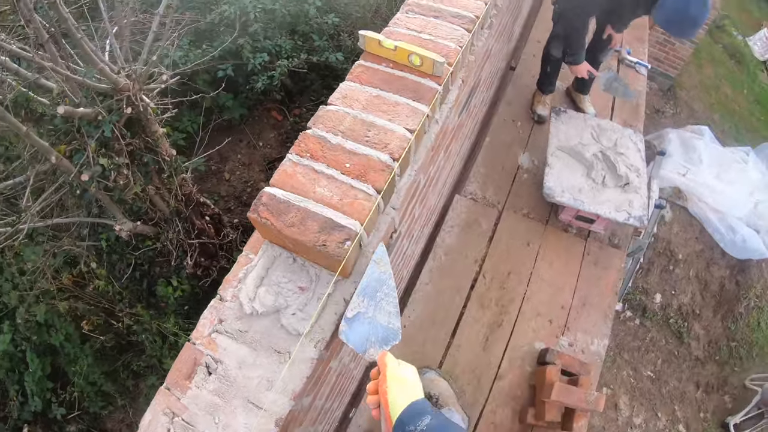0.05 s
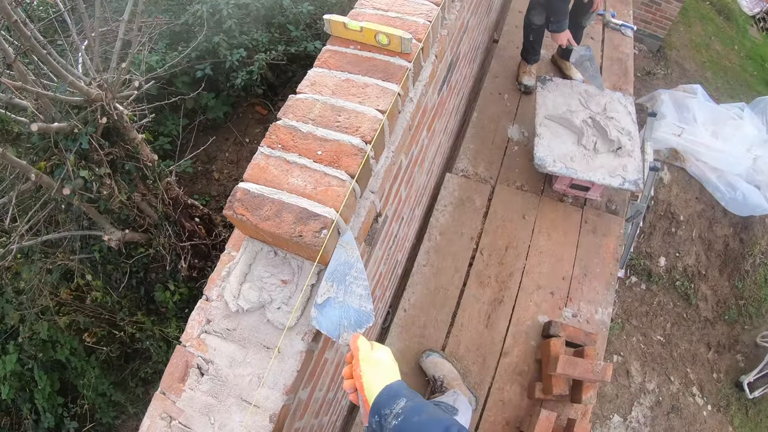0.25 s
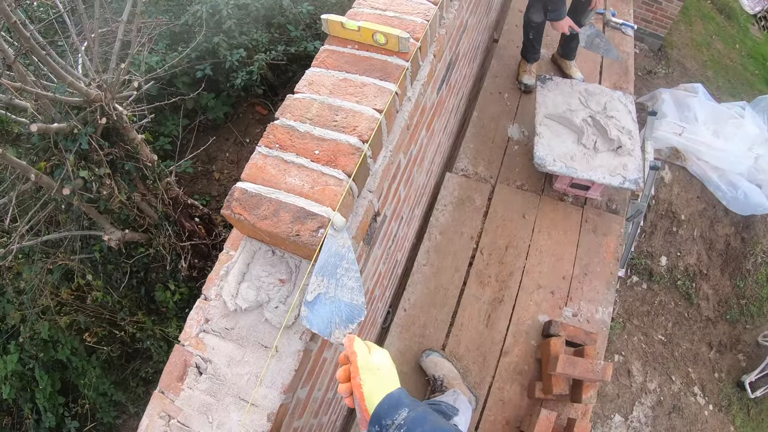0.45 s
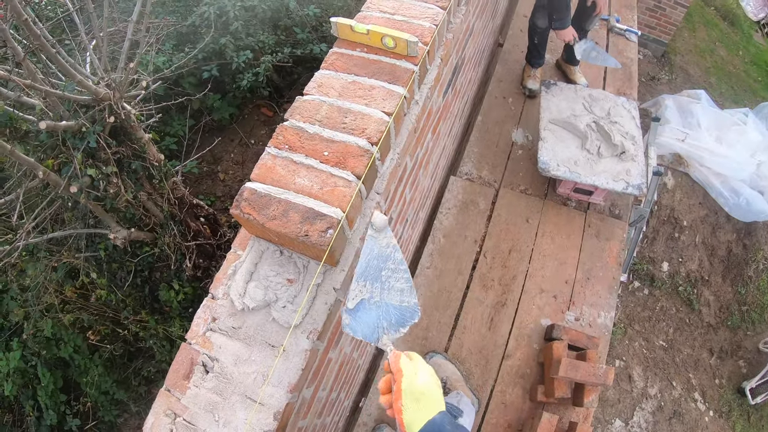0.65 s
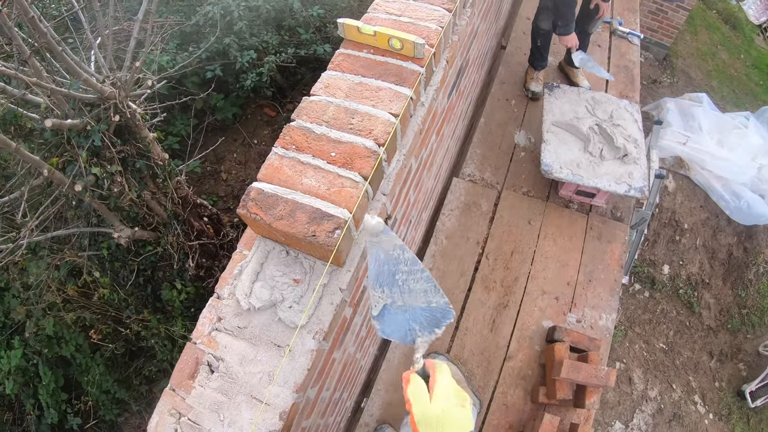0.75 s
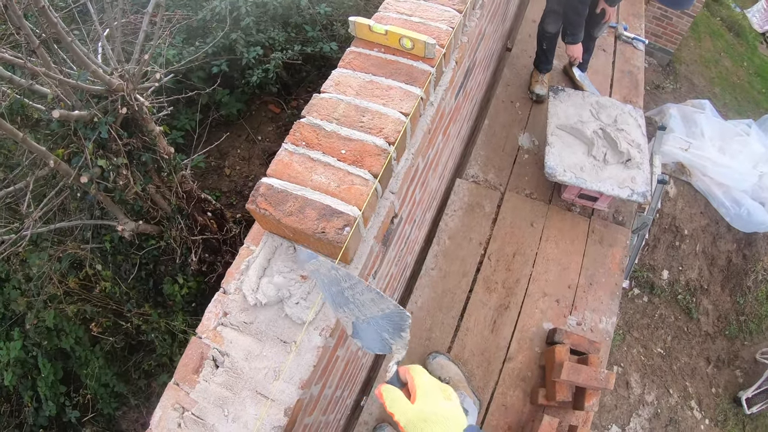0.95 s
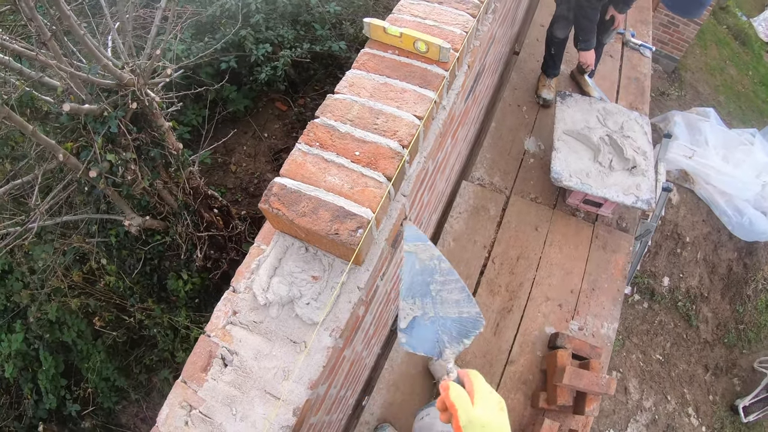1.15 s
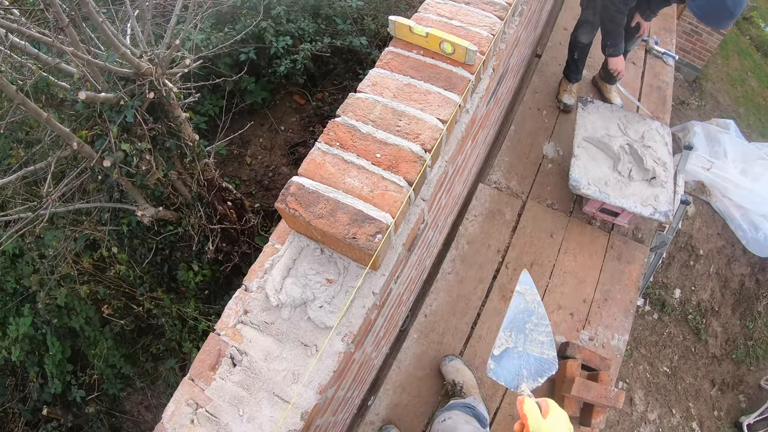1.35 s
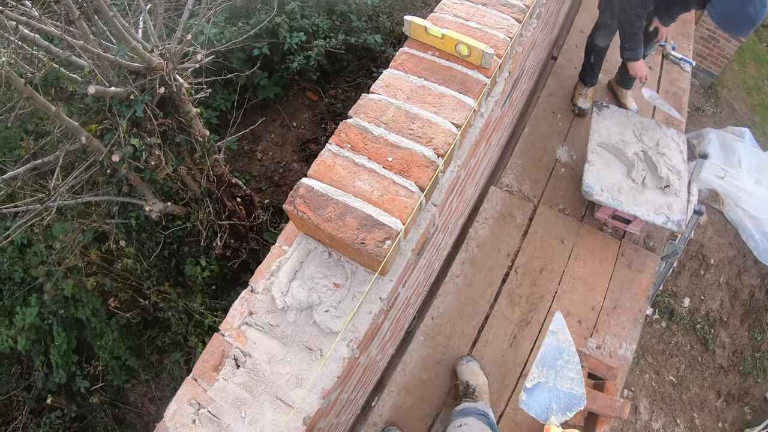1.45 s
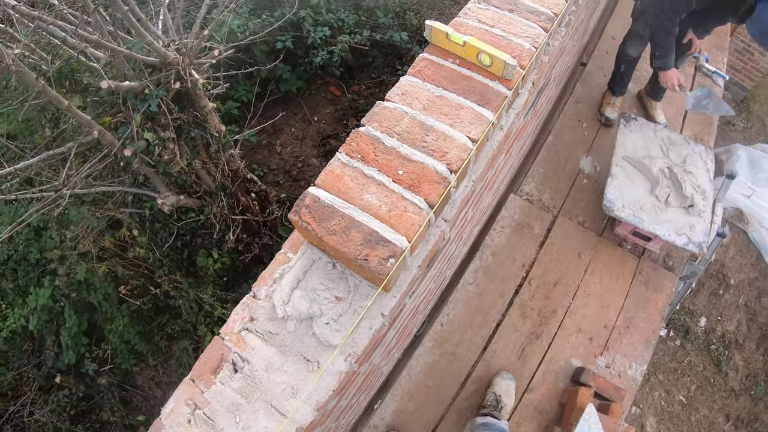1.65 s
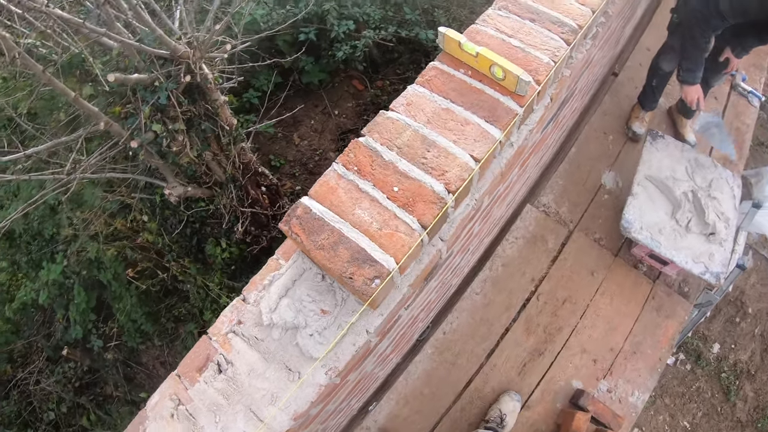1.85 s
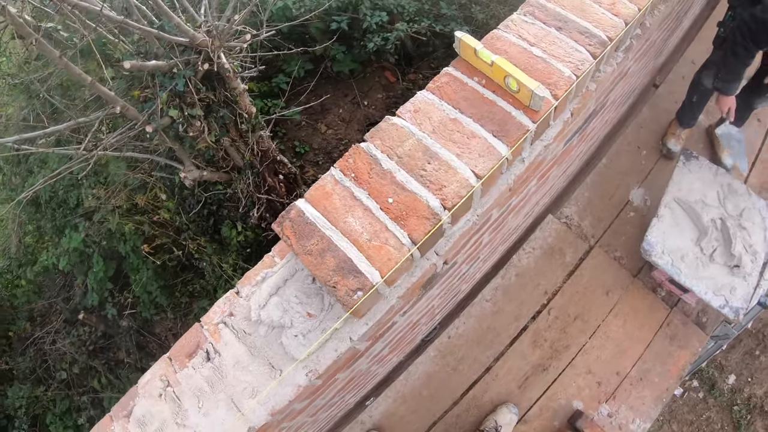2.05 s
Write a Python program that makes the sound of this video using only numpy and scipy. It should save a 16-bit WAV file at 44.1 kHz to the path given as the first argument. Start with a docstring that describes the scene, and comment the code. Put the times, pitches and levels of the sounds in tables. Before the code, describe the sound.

A steel trowel scrapes briefly along gritty mortar outdoors, with faint birds and light wind.

```python
"""A scaffold at a brick wall in a garden. A steel trowel touches the wall and scrapes once along the
mortar joint: sand grinds under the edge, which catches on coarse grit and sets the blade ringing.
Further along the scaffold another trowel clinks and scuffs. Small birds whistle in the trees, a distant
rush and a soft rustle fill the garden, and a gust brushes the microphone."""
import sys
import numpy as np
from scipy import signal
from scipy.fft import rfft, irfft, next_fast_len
from scipy.io import wavfile
from scipy.ndimage import map_coordinates

SR = 44100
rng = np.random.default_rng(int(sys.argv[2]) if len(sys.argv) > 2 else 0)


def generate_wav(signal):
    """Clip the signal to [-1, 1] and save it as 16-bit WAV at the path in sys.argv[1]."""
    frames = np.transpose(np.atleast_2d(signal))
    scaled = np.clip(frames, -1, 1) * 32767
    pcm = np.round(scaled).astype(np.int16)
    wavfile.write(sys.argv[1], SR, pcm)


N = 92610
TIME = np.arange(N) / SR


# the grind follows the pressure of the edge on the joint: time_s, level_db
EDGE_PRESSURE = [(.238, -71.5), (.246, -49), (.272, -51), (.337, -40), (.368, -40.5), (.395, -37.5),
                 (.416, -41), (.43, -37), (.45, -35.5), (.472, -37), (.484, -44), (.502, -61), (.515, -85)]
# the edge lands or catches on grit: start_s, crunch_db, kick_db
EDGE_CATCHES = [(0.241, -36.5, -45), (0.2464, -37.5, -21), (0.329, -55, -23), (0.3397, -33, -31),
                (.3607, -37.5, -6), (0.3702, -31.5, -14), (0.3899, -43, -13.5), (.424, -26.5, -10.5),
                (0.4352, -37.5, -23), (0.4432, -29.5, -5.5), (0.4491, -36, -13), (0.461, -46, -10),
                (.465, -28, -13.5), (0.4728, -44, -16.5), (0.498, -63, -25.5)]
def trowel():
    """One scrape: grinding and sharp catches sound directly and ring the blade; crumbs snap off."""
    pressure_db, = in_time(EDGE_PRESSURE)
    grind = from_db(pressure_db + judder_db())
    crunch = bursts([(s, db) for s, db, _ in EDGE_CATCHES], decay_s=0.0024)
    force = np.hypot(grind, crunch)
    soften = signal.butter(2, 1960, fs=SR, output="sos")
    kicks = signal.sosfilt(soften, clicks([(s, db) for s, _, db in EDGE_CATCHES]))

    def contact(blows):
        grit = from_db(-3) * sand(force) + crumbs() + from_db(-10.5) * force * coarse_grit()
        return grit + blade(from_db(-7) * force * grains() + blows)
    mid = contact(kicks)
    direct = stereo(mid, side=contact(0))
    wall_and_boards = from_db(-27.5) * echo(mid, t60_s=0.16, build_s=0.0032)
    return direct + wall_and_boards + from_db(-21) * tree_echo(mid)


def judder_db(depth_db=3, slips_per_s=125, unevenness=0.2086):
    """The level shudders as the edge sticks and slips, almost regularly."""
    rate_hz = slips_per_s * (1 + unevenness * drift(slips_per_s / 2))
    return depth_db * np.cos(2 * np.pi * np.cumsum(rate_hz) / SR)


def grains(per_s=9000, spread_db=2):
    """Sand grains break at random, most small and a few large."""
    sizes = from_db(spread_db * np.minimum(rng.exponential(1, N), 3)) * rng.choice([-1, 1], N)
    return rms_one(sizes * (rng.random(N) < per_s / SR))


# tone of grinding sand: frequency_hz, gain_db
SAND_EQ = [(100, -17), (250, 1.5), (600, -19.5), (800, -6.5), (1600, 5.5), (2100, -6), (2800, -2),
           (4000, -3), (5200, -11.5), (7500, -17.5), (9800, -17), (11500, -28.5), (15000, -32)]
def sand(force):
    """The body of the scrape: sand grinds louder as the edge bears down."""
    return colour(force * grains(), SAND_EQ)


# mortar snaps: start_s, level_db
CRUMB_SNAPS = [(.2462, -34), (.37, -31.5), (.4305, -34), (.445, -30), (.4925, -33.5), (.4998, -32)]
# their brittle tone: frequency_hz, gain_db
CRUMB_EQ = [(300, -27), (1100, 4), (2300, -26), (3300, 6), (3900, 7.5), (5200, -11.5), (9000, -14.5),
            (15000, -38)]
def crumbs():
    """Crumbs of mortar break off under the edge in tiny gritty bursts."""
    return colour(bursts(CRUMB_SNAPS, decay_s=0.0031) * grains(), CRUMB_EQ)


# steel modes, with places along the edge from 0 to 1:
# pitch_hz, drive_db, t60_s, sweet_spot, loss_db_per_edge, bend_hz_per_edge
BLADE_MODES = [(489, -8, 0.25, 0.64, 50, -220), (683, -6.5, 0.15, 0.12, 44, -2),
               (1028.6, 1.5, 0.11, 0, 14.5, -33.5), (1069, 0, 0.057, 0.95, 13, 0),
               (1094.5, 4.5, 0.13, 0.96, 12, -7), (1228, -1, 0.19, 0.05, 28, -39),
               (1558, -10, .05, 0.8, 15, -13), (1676, 0.5, 0.09, 0.14, 28, 0),
               (1823, -8.5, 0.087, 0.4, 13, 2), (2380, 0.5, .036, 0.37, 11.5, -60),
               (3092, 0, 0.06, 0.73, 30, -250), (3504, 1, 0.02, 0.13, 21, -100),
               (3860, -8, 0.018, 0.87, 10, -200), (4465, -11, 0.027, .8, 22, -5),
               (6190, -2, 0.013, 0.56, 49, 0), (9000, -7, .012, 0.63, 25, 301)]
# how well the blade gives off sound: frequency_hz, gain_db
BLADE_RADIATION = [(500, 1), (780, -3), (980, 1), (9400, -0.5), (11500, -14)]
def blade(force, start_s=0.24, stroke_s=0.25):
    """The contact slides along the edge, bending each mode and driving it most at its sweet spot."""
    place = np.clip((TIME - start_s) / stroke_s, 0, 1)
    steel = 0
    for hz, db, t60_s, sweet_spot, loss, bend in BLADE_MODES:
        offset = place - sweet_spot
        steel += ring(force * from_db(db - loss * np.abs(offset)), hz + bend * offset, t60_s)
    return colour(steel, BLADE_RADIATION, keep_power=False)


def coarse_grit(cracks_per_s=900, range_hz=(2790, 9760), pitches=14, t60_cycles=83):
    """Larger grains crack, each with a very short ring at a pitch of its own."""
    crackle = 0
    for hz in np.geomspace(*range_hz, pitches):
        cracks = (rng.random(N) < cracks_per_s / pitches / SR) * rng.uniform(-1, 1, N)
        decay = from_db(-60 * hz / (t60_cycles * SR))
        resonance = [1, -2 * decay * np.cos(2 * np.pi * hz / SR), decay * decay]
        crackle += signal.lfilter([1, 0, -1], resonance, cracks + 1e-18)
    return rms_one(colour(crackle, BLADE_RADIATION))


# the far trowel knocks: start_s, knock_db, ring_db
FAR_CLINKS = [(.003, -44.5, -40), (1.089, -45.5, -42), (1.092, -51, -26.5)]
# tone of the knocks: frequency_hz, gain_db
CLINK_EQ = [(100, -6.5), (270, 1), (900, -0.5), (1600, 0.5), (3200, -2), (4500, -10.5), (8000, -9),
            (10500, -32), (14000, -38)]
# ring of the far trowel and the low thud of the board under it: pitch_hz, drive_db, t60_s
FAR_MODES = [(242.5, 2.5, 0.2), (577, -2.5, 0.049), (1583, -1, 0.19), (3190, 0.5, 0.089), (7870, -12, .1),
             (8900, -23, 0.12)]
# the trowel scuffs through mortar: start_s, length_s, level_db
FAR_SCUFFS = [(0.96, 0.04, -60), (1.264, 0.029, -70.5)]
# tone of the scuffs: frequency_hz, gain_db
SCUFF_EQ = [(500, -24), (3500, 6), (6000, -4), (9500, -5.5), (14000, -28)]
def far_trowel():
    """Gritty knocks ring a second trowel and thud the wooden board under it; it also scuffs softly."""
    knock = bursts([(s, db) for s, db, _ in FAR_CLINKS], decay_s=0.0094)
    scuff = sum(from_db(db) * np.sin(np.pi * np.clip((TIME - s) / length, 0, 1))
                for s, length, db in FAR_SCUFFS)
    mid, side = (colour(knock * grains(), CLINK_EQ) + colour(scuff * grains(), SCUFF_EQ)
                 for _ in range(2))
    blows = clicks([(s, db) for s, _, db in FAR_CLINKS])
    mid += sum(ring(from_db(db) * blows, hz, t60_s) for hz, db, t60_s in FAR_MODES)
    return stereo(mid, side) + from_db(-6.5) * tree_echo(mid)


# thin far whistles: start_s, length_s, start_hz, middle_hz, end_hz, relative_db
BIRD_WHISTLES = [(0, 0.041, 8640, 8460, 8240, -68), (0.885, 0.052, 7400, 6500, 6070, -66),
                 (0.924, 0.03, 6400, 6240, 5620, -67), (0.956, 0.03, 6050, 4840, 3890, -60.5),
                 (1.012, 0.21, 8700, 8400, 8140, -79), (1.045, 0.056, 7700, 6850, 6760, -76),
                 (1.114, 0.128, 6480, 6510, 6700, -75.5), (1.286, 0.079, 7970, 7520, 7430, -71),
                 (1.379, 0.13, 7900, 7390, 7190, -77.5), (1.637, 0.11, 5600, 5410, 5340, -72.5)]
# a run of far, falling chips: start_s, length_s, middle_hz, fall_hz, relative_db
BIRD_CHIPS = [(0.56, 0.021, 4530, 1470, -68.5), (0.636, 0.016, 4860, 694, -67),
              (0.666, 0.015, 4500, 1550, -67), (0.71, 0.013, 5200, 393, -65),
              (0.774, .012, 4750, 1800, -63)]
# a nearer bird's arched calls: start_s, length_s, pitch_hz, relative_db
BIRD_CALLS = [(1.755, .11, 8060, -62.5), (1.916, 0.092, 8620, -57.5), (2.046, 0.12, 8150, -57)]
# the arch of each call: length_fraction, pitch_ratio
PITCH_ARCH = [(0, 0.63), (.13, .9), (.38, 0.97), (.6, 0.92), (.85, .92), (1, .78)]
def birds():
    """Nearly pure notes swell, glide and warble, and echo from the trees."""
    warble = 1 + 0.00584 * drift(rate_hz=130)
    flutter = from_db(3 * drift(rate_hz=67))
    rasp = 1 + 0.014 * drift(rate_hz=380)  # roughens the pitch of chips and calls

    def note(start_s, length_s, db, pitch):
        progress = np.clip((TIME - start_s) / length_s, 0, 1)
        swell = np.abs(np.sin(np.pi * progress)) ** 0.59
        phase = 2 * np.pi * np.cumsum(pitch(progress) * warble) / SR
        return from_db(db) * np.sqrt(2) * swell * np.sin(phase)
    far = sum(note(s, length, db, np.poly1d(np.polyfit([0, .5, 1], glide_hz, 2)))
              for s, length, *glide_hz, db in BIRD_WHISTLES)
    far += sum(note(s, length, db, lambda u: rasp * (hz + fall * (.5 - u)))
               for s, length, hz, fall, db in BIRD_CHIPS)
    near = sum(note(s, length, db, lambda u: hz * rasp * np.interp(u, *np.transpose(PITCH_ARCH)))
               for s, length, hz, db in BIRD_CALLS)
    direct = far + near * from_db([[-3], [2]])  # the nearer bird sits to the right
    return flutter * direct + from_db(-2) * tree_echo(flutter * (far + near))


# the gust swells and swings: time_s, level_db, left_minus_right_db
WIND_GUST = [(0, -59, 9), (.14, -73, -16), (.23, -54, -7), (.28, -62, 0), (.52, -60.5, -12.5),
             (.67, -43, 11.5), (.73, -44, 4.5), (.78, -36.5, 23.5), (.85, -40.5, 2), (.92, -52, -2),
             (1.04, -46.5, 0), (1.13, -54.5, -7), (1.26, -51.5, -0.5), (1.56, -68, 2), (1.7, -52.5, 0),
             (2.03, -57.5, 1.5), (2.1, -47, 1)]
# its rumble: frequency_hz, gain_db
WIND_EQ = [(15, -0.5), (35, 4), (60, -4.5), (83, 4), (105, -5.5), (200, -18.5), (350, -50.5), (6000, -100)]
def wind():
    """Lumpy low buffeting, partly shared by the two microphone ports."""
    level_db, pan_db = in_time(WIND_GUST)
    shared, *each_port = colour(rng.standard_normal((3, N)), WIND_EQ)
    rumble = rms_one(shared + 1.7 * np.array(each_port))
    return rumble * from_db(level_db + pan_db * np.array([[.5], [-.5]]))


# tone of the rush: frequency_hz, gain_db
RUSH_EQ = [(30, 1.5), (110, -17), (160, 3), (240, 4), (340, -4.5), (450, -12), (580, -19), (780, -10.5),
           (1000, -13), (1300, -8), (1700, -11.5), (3000, -16), (4500, -34.5), (9000, -40.5), (15000, -74)]
# its width: frequency_hz, side_gain_db
RUSH_WIDTH = [(40, -32), (120, -8.5), (250, -14.5), (550, -0.5), (1300, -1), (3000, -5), (6000, 8),
              (14000, -1.5)]
# its fader: time_s, level_db
RUSH_FADER = [(0, -53.5), (.3, -54.5), (1.0, -56), (1.4, -55.5), (1.75, -54.5), (2.1, -55.5)]
def distant_rush():
    """A wide, nearly steady bed of low noise."""
    mid, side = colour(rng.standard_normal((2, N)), RUSH_EQ)
    level_db, = in_time(RUSH_FADER)
    return stereo(mid, side, RUSH_WIDTH) * from_db(level_db)


# tone of the rustle: frequency_hz, gain_db
RUSTLE_EQ = [(1000, 8.5), (4500, 5), (7500, -5), (11000, -28)]
# its fader: time_s, level_db
RUSTLE_FADER = [(0, -59), (.2, -106), (.55, -65), (.85, -66), (1.62, -85), (1.85, -65.5), (2.1, -63)]
def rustle():
    """Soft, brighter noise that flickers as it comes and goes."""
    mid, side = colour(rng.standard_normal((2, N)), RUSTLE_EQ)
    level_db, = in_time(RUSTLE_FADER)
    return stereo(mid, side) * from_db(level_db + 1.7 * drift(rate_hz=30.33))


def tree_echo(x):
    """The foliage scatters sound back in a short tail."""
    return echo(x, t60_s=0.34, build_s=0.0027)


def echo(x, t60_s, build_s):
    """Diffuse reflections build up and die, different in each ear."""
    envelope = from_db(-60 * TIME / t60_s) * (1 - np.exp(-TIME / build_s))
    tail = rms_one(rng.standard_normal((2, N)) * envelope) / np.sqrt(N)
    return signal.fftconvolve(x[None], tail, axes=1)[:, :N]


# width of the trowels and the rustle: frequency_hz, side_gain_db
STEREO_WIDTH = [(200, -21), (1000, -5.5), (2400, -27.5), (4500, -32), (7000, -0.5), (14000, -8)]
def stereo(mid, side, width=STEREO_WIDTH):
    """Left and right from a middle and a filtered side."""
    return mid + colour(side, width, keep_power=False) * np.array([[1], [-1]])


def ring(force, hz, t60_s):
    """One mode, whose pitch may move while it rings."""
    decay = from_db(-60 / (t60_s * SR))
    turn = np.exp(2j * np.pi * np.cumsum(np.broadcast_to(hz, N)) / SR)
    envelope = signal.lfilter([1, 1], [1, -decay], force / turn + 1e-18)
    return np.sqrt((1 - decay * decay) / 2) * np.real(turn * envelope)


def bursts(rows, decay_s):
    """Envelope of sudden, dying bursts from rows of start_s, level_db."""
    return sum(from_db(db) * (TIME >= s) * np.exp(-np.abs(TIME - s) / decay_s) for s, db in rows)


def clicks(rows):
    """Single clicks from rows of start_s, level_db."""
    out = np.zeros(N)
    for s, db in rows:
        out[int(s * SR)] += from_db(db)
    return out


def colour(x, points, keep_power=True):
    """Minimum-phase EQ through points of frequency_hz, gain_db."""
    size = 2 * next_fast_len(N)
    hz, db = np.transpose(points)
    bin_hz = np.arange(size // 2 + 1) * SR / size
    gain = from_db(np.interp(np.log(bin_hz + 1), np.log(hz), db))
    cepstrum = irfft(np.log(rms_one(gain) if keep_power else gain))
    cepstrum[1:size // 2] *= 2
    cepstrum[size // 2 + 1:] = 0
    return irfft(rfft(x, size) * np.exp(rfft(cepstrum)))[..., :N]


def drift(rate_hz):
    """Smooth random wobble of unit power, up to about rate_hz."""
    knots = rng.standard_normal(4096)
    return rms_one(map_coordinates(knots, [TIME * rate_hz * 2], order=3, mode="wrap"))


def in_time(rows):
    """Each column of a timed curve at every sample."""
    time_s, *columns = np.transpose(rows)
    return [np.interp(TIME, time_s, column) for column in columns]


def from_db(db):
    """Decibels to gain."""
    return 10 ** (np.asarray(db) / 20)


def rms_one(x):
    """Scale to unit power."""
    return x / np.sqrt(np.mean(x ** 2) + 1e-20)


def scene():
    """Everything at the microphone."""
    return trowel() + far_trowel() + birds() + distant_rush() + rustle() + wind()


def record(dry, cutoff_hz=14900):
    """A steep low-pass takes off the very top."""
    return signal.sosfilt(signal.ellip(10, .2, 70, cutoff_hz, fs=SR, output="sos"), dry)


dry = scene()
out = record(dry)
generate_wav(out)
```